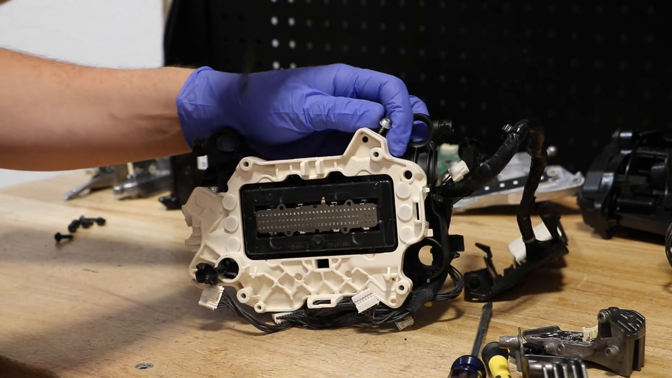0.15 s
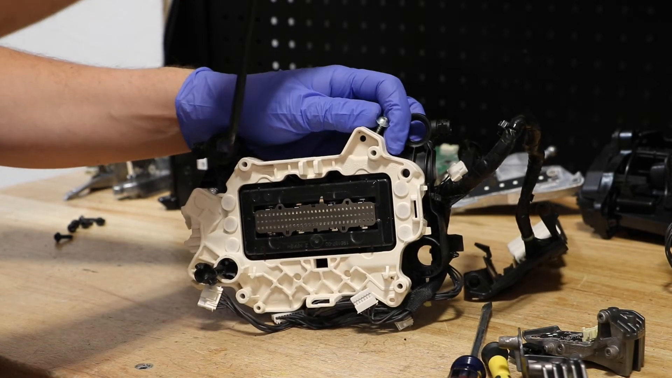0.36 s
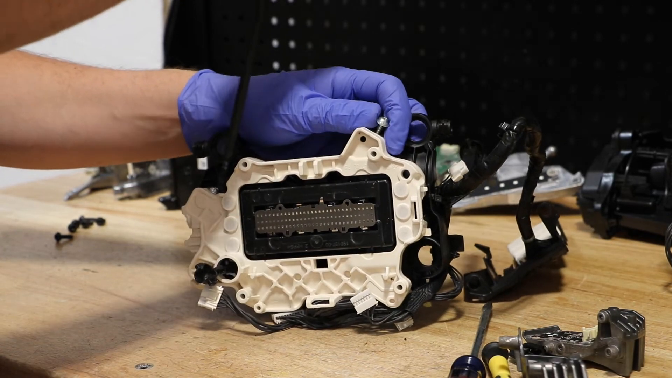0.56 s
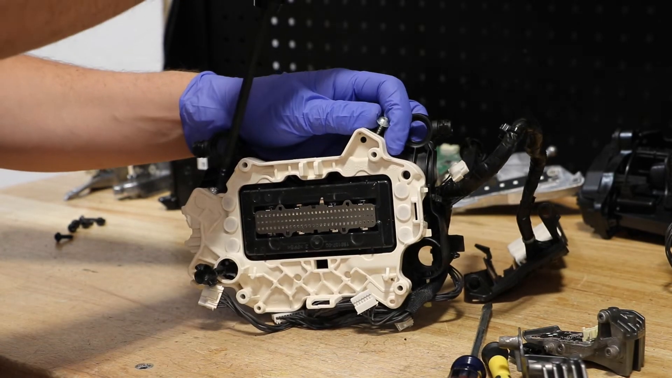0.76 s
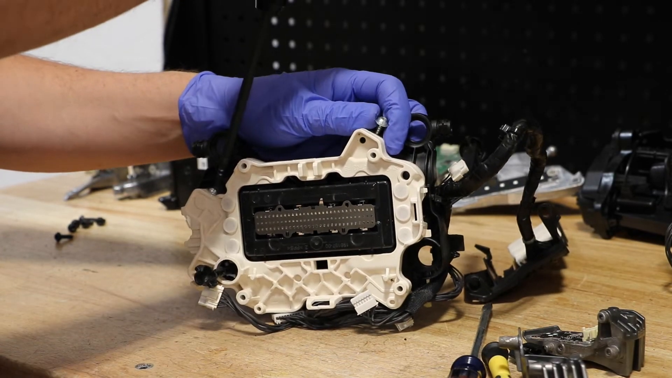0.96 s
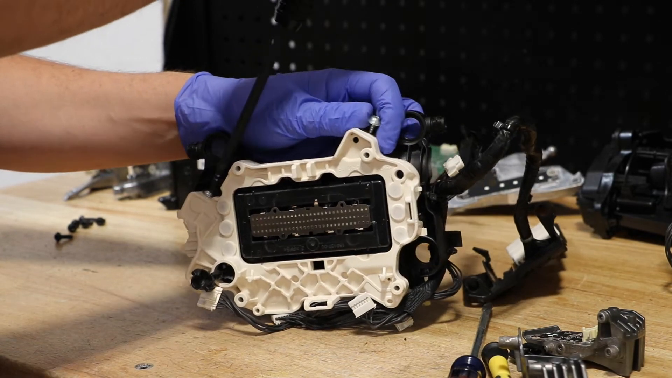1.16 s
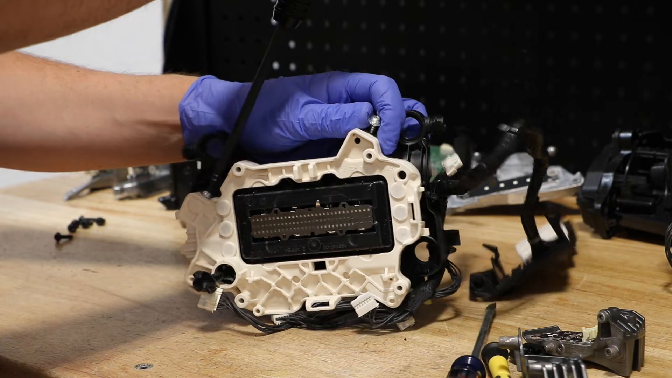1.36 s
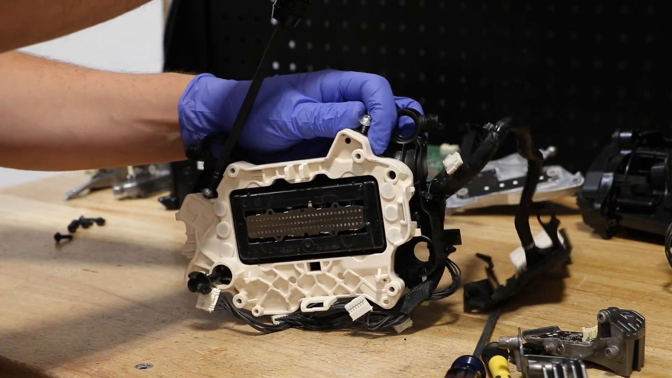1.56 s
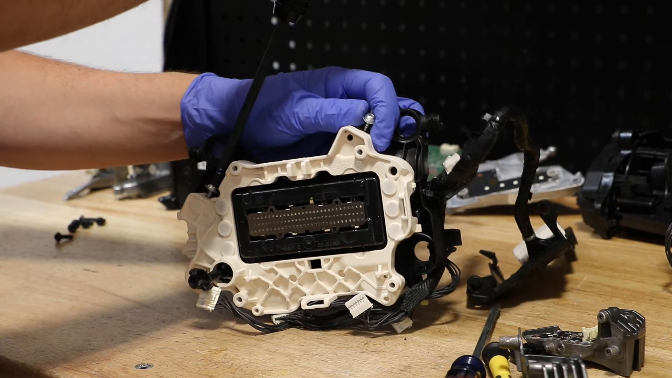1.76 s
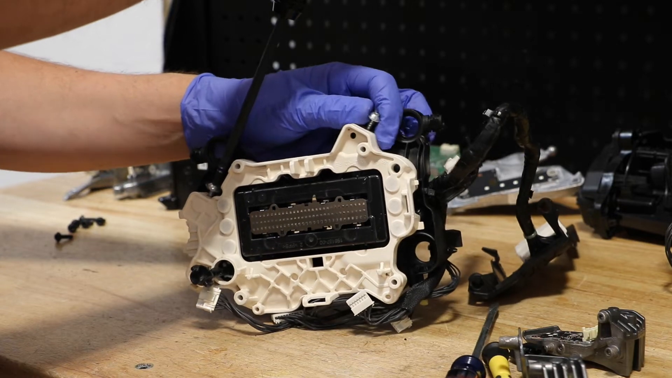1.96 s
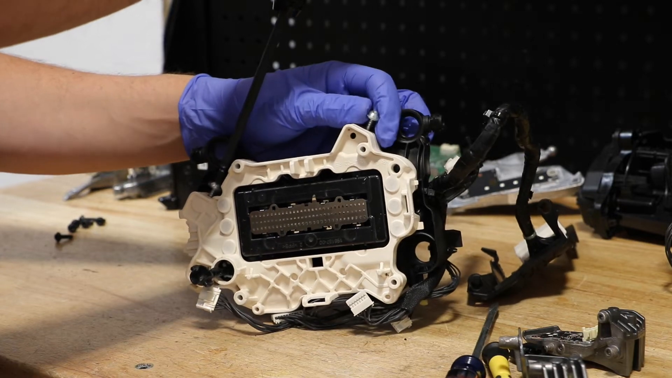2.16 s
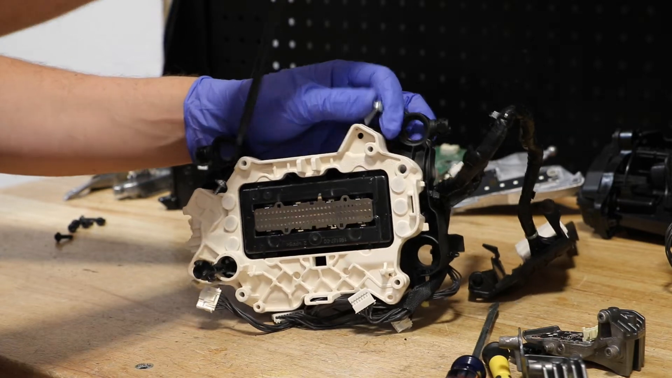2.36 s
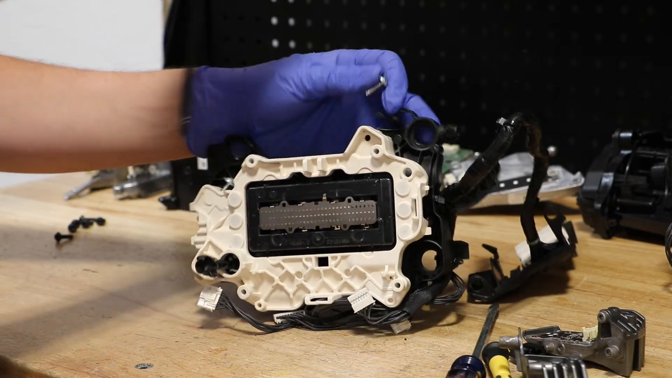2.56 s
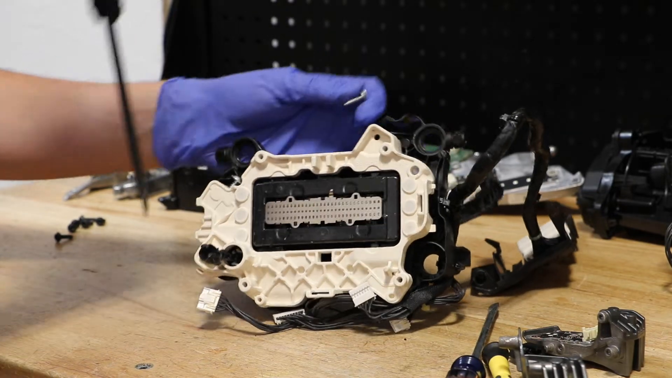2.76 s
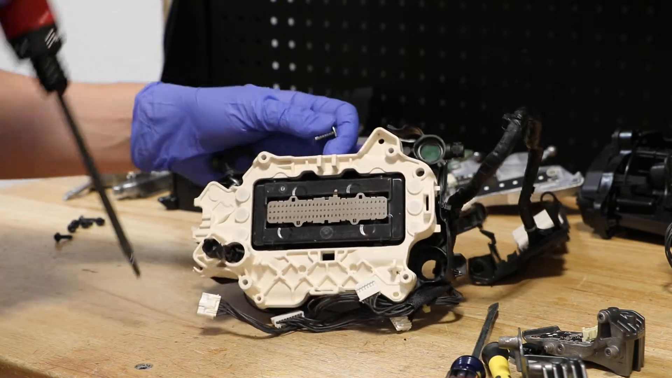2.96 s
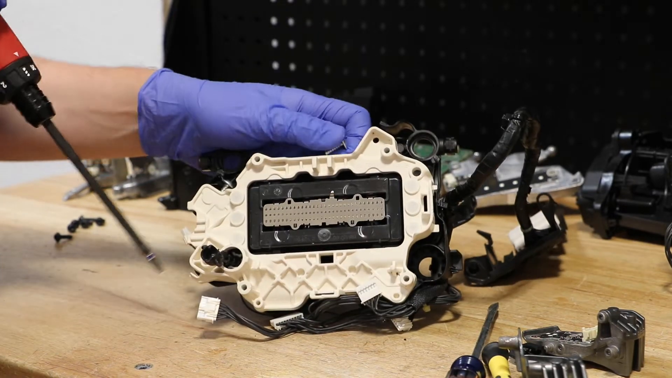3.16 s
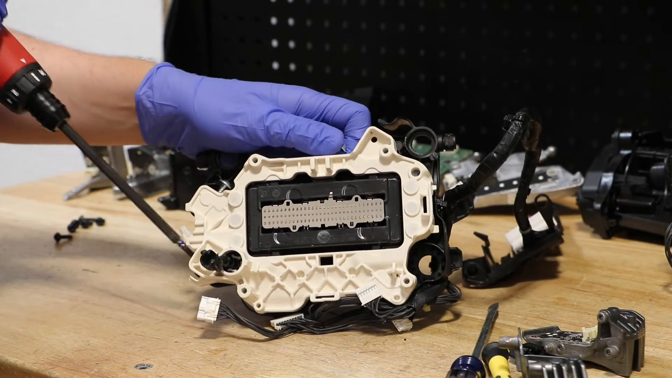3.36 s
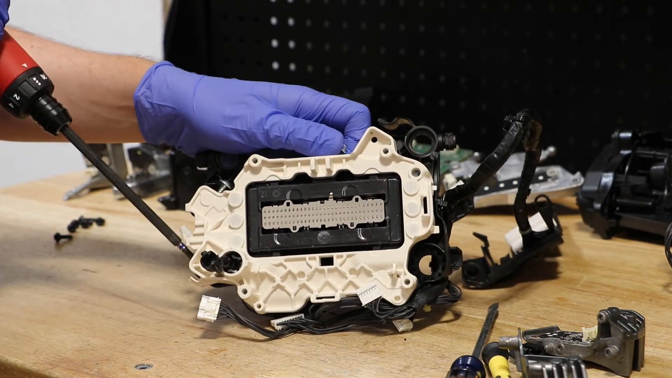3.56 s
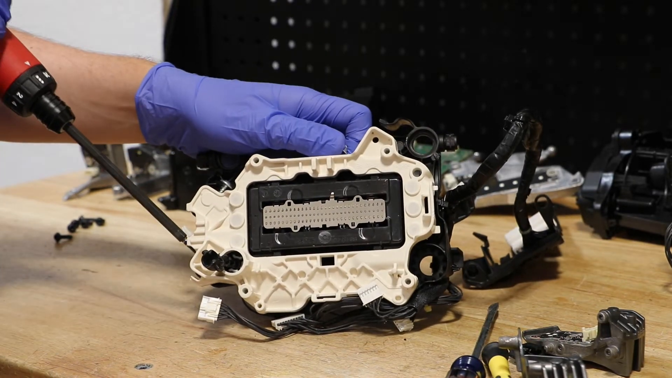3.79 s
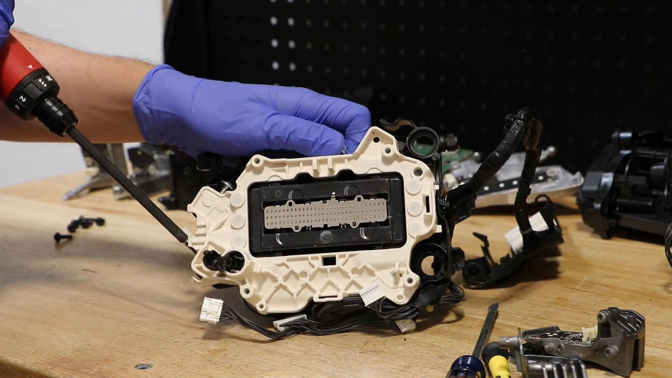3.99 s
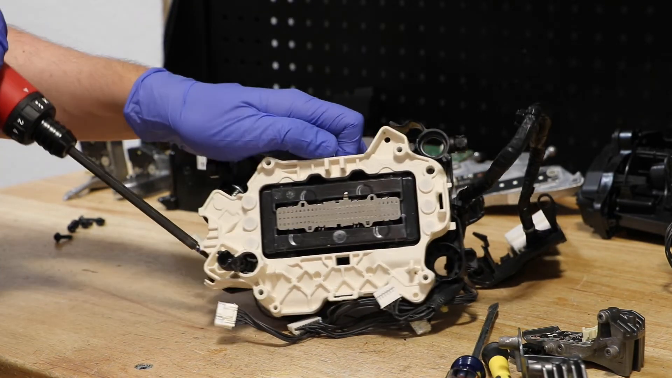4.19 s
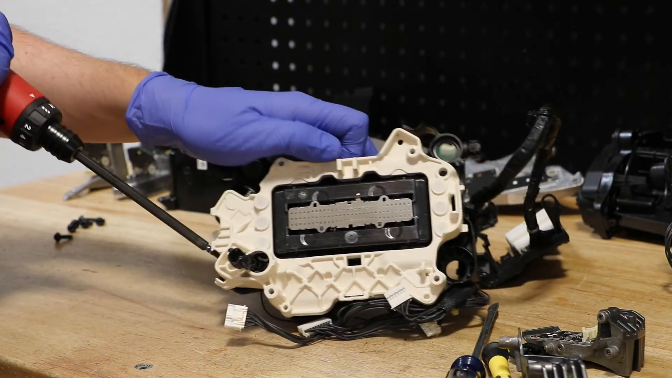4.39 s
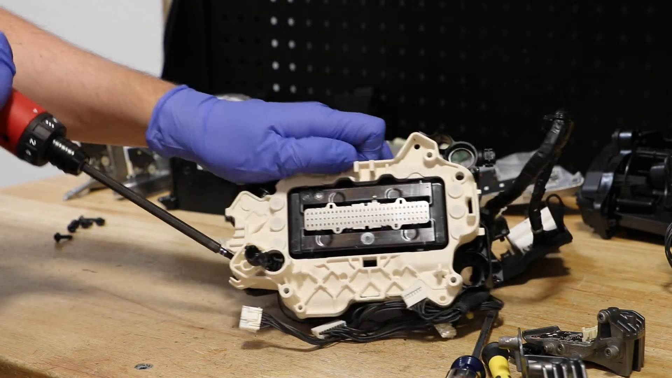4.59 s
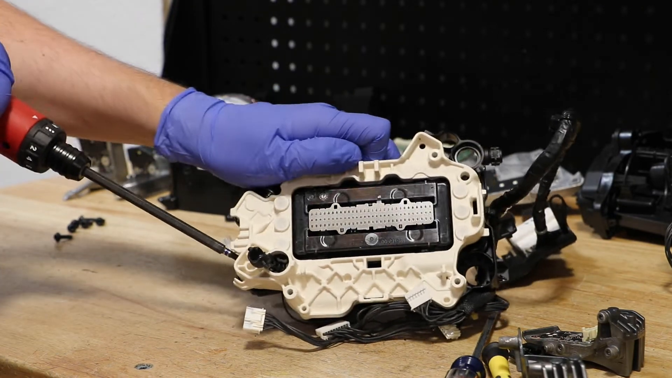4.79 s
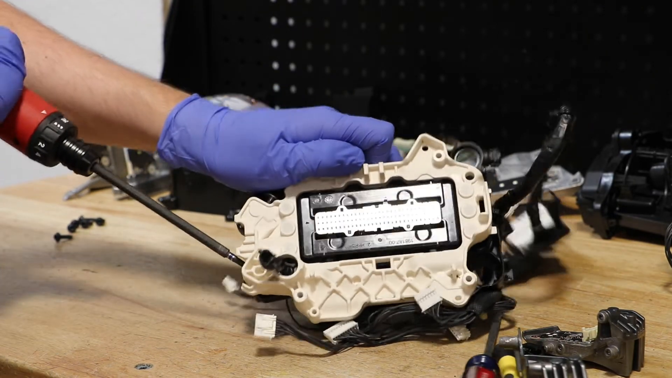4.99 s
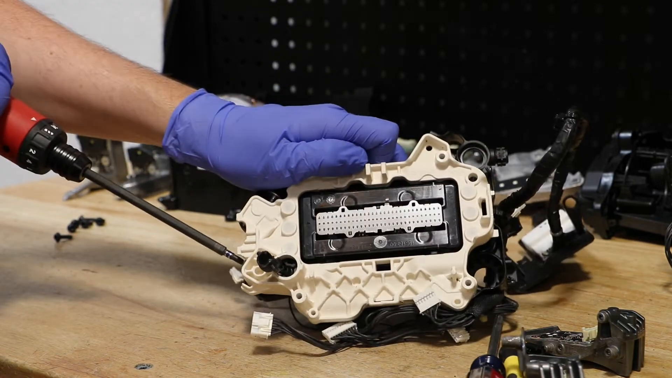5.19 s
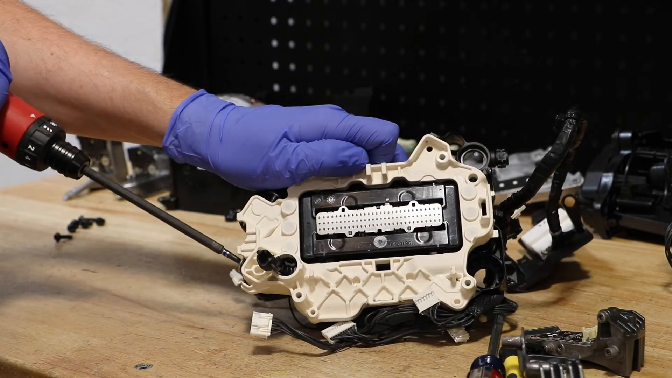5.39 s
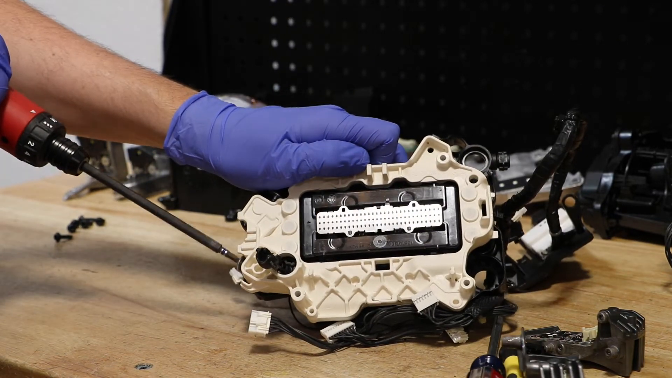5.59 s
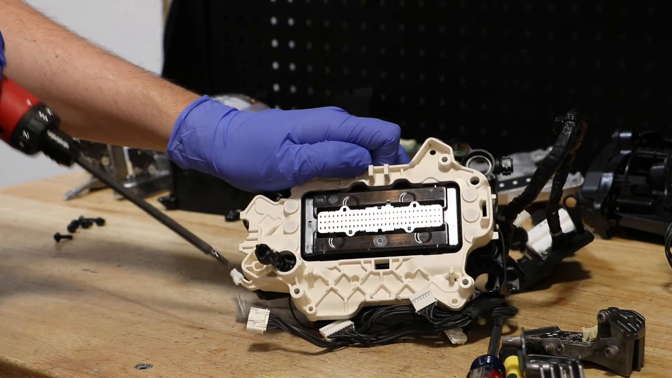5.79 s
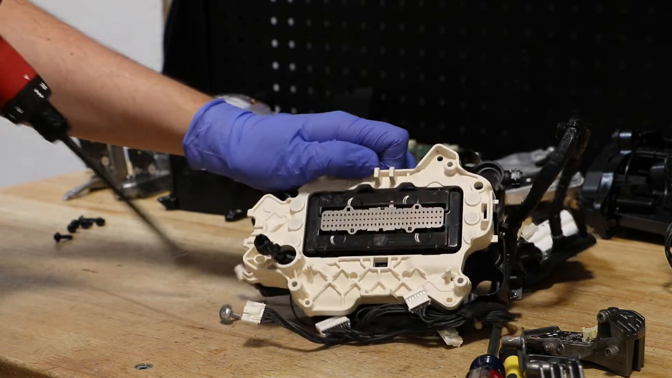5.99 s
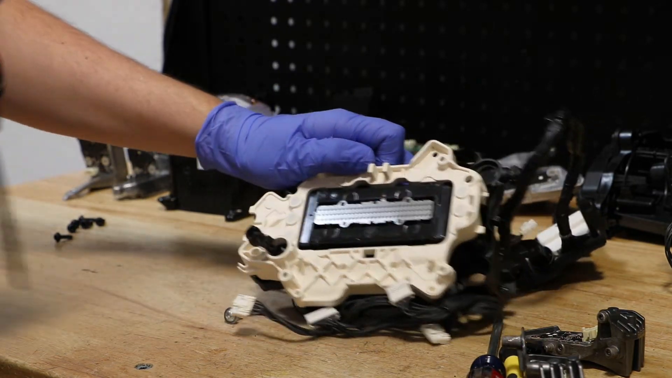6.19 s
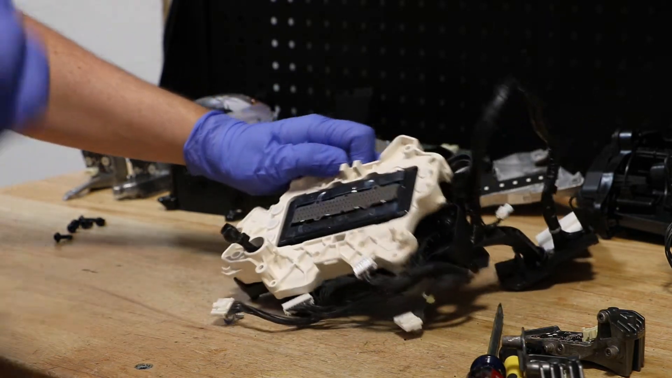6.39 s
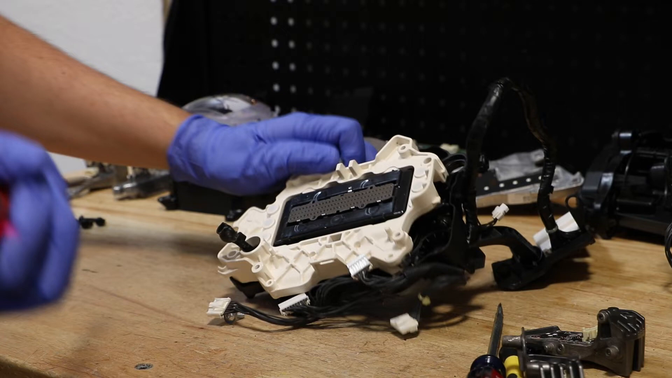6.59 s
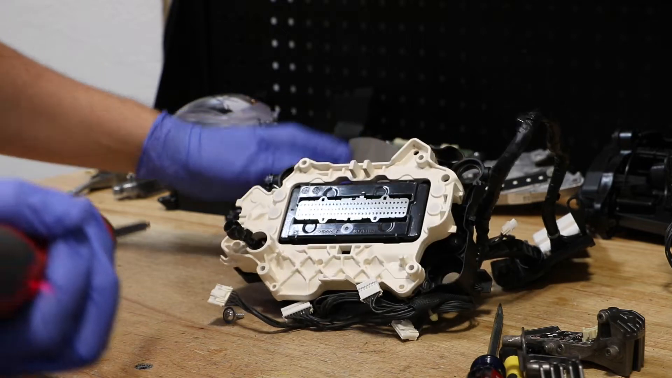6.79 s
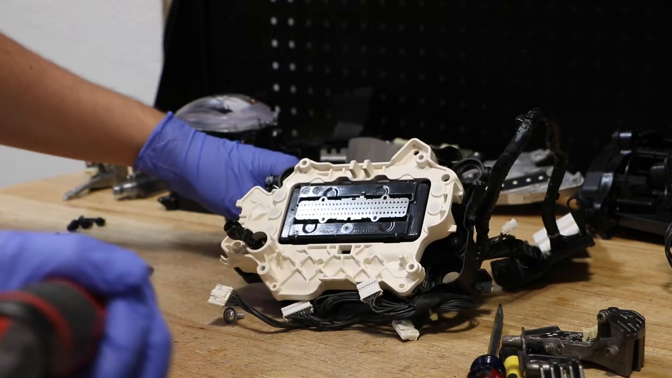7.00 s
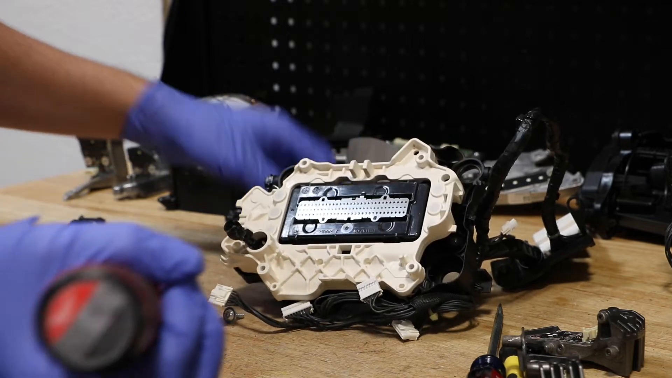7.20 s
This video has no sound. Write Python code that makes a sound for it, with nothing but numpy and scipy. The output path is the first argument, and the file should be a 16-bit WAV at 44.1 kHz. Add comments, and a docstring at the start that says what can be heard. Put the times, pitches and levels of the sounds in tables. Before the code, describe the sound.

The last rattle of a slowing power screwdriver fades, sharp plastic clicks follow, and the tool whines up for about a second, rattling hard before coasting down. Knocks, a ringing bit, dull bench bumps, scrapes and glove rubs fill the pause. A second, stronger-whining burst starts with a heavy thump, then handling knocks close it. Close mono microphone, small cluttered workshop with short reverberation.

```python
"""A motor's rattle dies away amid clicks; then a cordless screwdriver twice whines up, rattles and coasts down.
It backs screws out of a plastic housing on a wooden bench, close to a mono microphone. Tonal partials follow
the rotor, and random impacts ringing a shell make the rattle. Decaying modes make the knocks of bit and screws
and the bumps on the bench; filtered slips make the rubbing of housing, gloved hand and wiring loom."""
import sys
import numpy as np
from scipy import signal
from scipy.fft import rfft, irfft
from scipy.io import wavfile

SR = 44100
rng = np.random.default_rng(int(sys.argv[2]) if len(sys.argv) > 2 else 0)


def transcribe(signal):
    """Save signal, clipped to [-1, 1], as a 16-bit WAV file at the path in sys.argv[1]."""
    frames = np.atleast_2d(signal).T
    limited = np.clip(frames, -1, 1)
    pcm = np.round(limited * 32767).astype(np.int16)
    wavfile.write(sys.argv[1], SR, pcm)


N = 319725
TIME = np.arange(N) / SR

# pulls of the trigger: trigger_s, bite_s, release_s, sag_under_load_hz, rattle_gain_db,
# extra_rattle_under_load_db, treble_at_full_speed_db, treble_per_halving_of_speed_in_coasting_db,
# whine_gain_db, whine_change_in_coasting_db
RUNS = [(-1.3, -1.2, -.31, 300, -21, 0, 2, -7, -48, -8),
        (1.245, 1.328, 2.19, 270, -21.8, 7, -3.3, -3.7, -28.5, -4),
        (4.822, 4.85, 5.8, 330, -21.2, 2.5, -5.8, -7.5, -23, -18)]
# partials of motor and gears: multiple_of_rotor_speed, relative_level_db; the third is the whine
PARTIALS_FIRST = [(2, -20), (3, -0.5), (4, -11), (6, -4.5), (7, -4), (7.5, -3.5)]
PARTIALS_SECOND = [(3, -2.5), (4, -11.5), (6, -42), (7, -10), (7.5, -4.5)]
# colour of the rattle: frequency_hz, relative_density_db_per_hz
RATTLE_FIRST = [(180, -46.5), (300, -30.5), (400, -33), (540, -10), (854, 1.5), (944, -1.5), (1690, -1),
                (2690, -1), (3330, 0), (5130, -11), (7280, -7.5), (10800, -13), (14400, -31), (15900, -62)]
RATTLE_SECOND = [(180, -39), (300, -25.5), (400, -22), (520, -12), (700, -2.5), (854, 0.5), (944, -2),
                 (2130, 0), (2690, -2), (3560, -0.5), (4880, -9), (6270, -8), (7910, -17), (10100, -17),
                 (14100, -35.5), (15900, -51)]


def screwdriver():
    """Forced vibration: rotor speed and screw load drive the rattle and whine of a dying run and two full ones."""
    out = np.zeros(N)
    spectra = [RATTLE_FIRST, RATTLE_FIRST, RATTLE_SECOND]
    # the dying run mostly rattles; its faint whine is a single partial
    partial_sets = [PARTIALS_SECOND[:1], PARTIALS_FIRST, PARTIALS_SECOND]
    for run, spectrum, partials in zip(RUNS, spectra, partial_sets):
        trigger, bite, release, sag_hz, rattle_db, strain_db, treble_db, dull_db, whine_db, coast_db = run
        whine_hz, load = motor(trigger, release, sag_hz)
        turns = rotor(whine_hz)
        speed = whine_hz / FREE_HZ * (TIME > bite)   # no rattle before the bit bites
        coasting = np.clip((TIME - release) * 20, 0, 1)
        treble = treble_db - dull_db * np.log2(speed + 1e-3) * coasting
        rattle_gain = from_db(rattle_db + strain_db * load)
        whine_gain = from_db(whine_db + coast_db * coasting)
        out += rattle_gain * rattle(speed, load, treble, spectrum, turns)
        out += whine_gain * whine(whine_hz, partials, turns)
    return out


# whine pitch without load, its fixed rate of rise, and the time constant of the loosening screw
FREE_HZ, SPIN_UP_HZ_PER_S, LOOSEN_S = 900, 2800, 0.28
# drag slows the rotor exponentially, towards a speed this far below rest: dry friction stops it
COAST_S, DRY_FRICTION_HZ = 0.9, 1130


def motor(trigger, release, sag_hz):
    """Rotational dynamics: steady spin-up, sag under a load that fades from one to zero, drag and dry friction."""
    driven_s = np.clip(TIME, trigger, release) - trigger
    load = np.exp(-driven_s / LOOSEN_S)
    driven_hz = np.minimum(SPIN_UP_HZ_PER_S * driven_s, FREE_HZ - sag_hz * load)
    coast = np.exp(-np.maximum(TIME - release, 0) / COAST_S)
    whine_hz = np.maximum((driven_hz + DRY_FRICTION_HZ) * coast - DRY_FRICTION_HZ, 0)
    return whine_hz, load


def rotor(whine_hz, wobble=.003):
    """Phase integration: turns of a rotor whose three poles give three whine cycles a turn."""
    return np.cumsum(whine_hz * (1 + wobble * drift(60))) / (3 * SR)


# how well the casing radiates the whine: whine_pitch_hz, gain_db
WHINE_RESPONSE = [(235, -45), (362, -22), (490, -7), (640, 0), (800, -1), (865, -1), (892, -9)]


def whine(whine_hz, partials, turns, flutter_db=3.0, backlash_turns=0.22, gear_rise=4.0):
    """Additive synthesis: a clean pole tone, and gear partials that grow with speed and waver with tooth play."""
    speed = whine_hz / FREE_HZ
    tones = np.zeros(N)
    for order, db in partials:
        level = from_db(db + flutter_db * drift(35))
        slip = 0
        if order != 3:
            level = level * speed ** gear_rise
            slip = backlash_turns * drift(70)   # in cycles of this partial
        tones += level * np.sin(2 * np.pi * (order * turns + slip))
    radiation = from_db(np.interp(whine_hz, *np.transpose(WHINE_RESPONSE)))
    return np.sqrt(2) * radiation * (whine_hz > 0) * tones


def rattle(speed, load, treble_db, spectrum, turns, low_db=-8.5, loaded_low_db=9.0, slow_low_db=4.0,
           loaded_treble_db=-4.0, throb=0.17, force_rise=0.45):
    """Shot noise: tooth and thread impacts ring the casing, throb each turn, thin when slow, deepen under load."""
    impacts = contacts(per_s=5000 * np.sqrt(speed), spread_db=2.0)
    impacts = impacts * (1 + throb * np.cos(2 * np.pi * turns)) * from_db(1.0 * drift(90))
    force = speed ** force_rise
    ringing = coloured(shell(impacts * force, share=0.56, t60=0.033), spectrum)
    low_level = low_db + loaded_low_db * load + slow_low_db * (1 - speed)
    levels = [low_level, 0, treble_db + loaded_treble_db * load]
    balanced = sum(from_db(level) * rms_one(band) for level, band in zip(levels, three_bands(ringing)))
    return np.sqrt(np.mean(np.sqrt(speed) * force ** 2)) * balanced


# the turning screw and the leaning hand shake the bench: start_s, held_s, gain_db
SHAKES = [(1.31, .03, -44), (1.71, .02, -51), (1.99, .19, -32), (3.88, .02, -45), (4.57, .05, -43),
          (4.93, .04, -32), (5.05, .05, -42), (5.44, .15, -37)]
# colour of the bench rumble: frequency_hz, relative_level_db
RUMBLE = [(25, -29), (45, -10), (68, 5), (100, -12), (135, -6), (185, -6), (260, -19), (600, -34),
          (1500, -69)]


def bench_shaking():
    """Structure-borne sound: random pushes heard as the low rumble of the bench."""
    gain = strokes(SHAKES, attack_s=0.07, release_s=0.09)
    return friction(gain, RUMBLE, per_s=600, spread_db=0.5, judder_db=1.0, level_db=-1.0)


# bit and screws knocking on the housing: start_s, level_db, contact_hardness_0_to_1, buzz_before_lift_db
KNOCKS = [(.011, -30, .7, -42), (.281, -55, .65, -72), (.463, -63, .45, -85), (.561, -65, .7, -88),
          (.726, -15.3, .62, -35), (.879, -27.5, .4, -51), (.989, -20.5, .82, -34.5),
          (1.0891, -14.5, .85, -31), (1.114, -19, .52, -37), (1.262, -31, .95, -48), (1.327, -27, .85, -45),
          (1.343, -14, .64, -40), (1.356, -17, 1.0, -45), (1.522, -20, .5, -39.5), (2.236, -16.5, 1.0, -58),
          (2.699, -41, .75, -44), (2.863, -29, .1, -55), (3.139, -29, .15, -43), (3.162, -39, .35, -56),
          (3.390, -32, .25, -62), (3.416, -16.5, .71, -31), (3.804, -48, .65, -35.5),
          (3.817, -33, .55, -32), (3.827, -26, .85, -42), (3.888, -22, .8, -48), (4.257, -41, .7, -60),
          (4.781, -25.5, .8, -42), (4.85, -28, .6, -38.5), (4.862, -15, .68, -38), (4.887, -12, .64, -48),
          (5.771, -20, .68, -43), (5.849, -15.5, .45, -40), (5.961, -19.5, .55, -38.5),
          (6.034, -20, .45, -47), (6.448, -25.5, .3, -37), (6.477, -27, .36, -41), (6.726, -51, .6, -74),
          (7.147, -24, .48, -48), (7.156, -15, .33, -36), (7.212, -17.3, .4, -42)]
# modes of the plastic housing, before the bands are balanced: frequency_hz, relative_level_db
HOUSING = [(620, -8.5), (830, 2.5), (1150, 0), (1550, 0.5), (2200, 4), (2900, 8.5), (3500, 7.5),
           (3900, 11.5), (5500, -6.5), (6150, -13), (7300, -15), (9000, -10), (10600, -15.5)]
# buzz of the steel bit and loose metal parts: frequency_hz, relative_density_db_per_hz
STEEL = [(500, -34), (1500, -9), (2000, 1), (2250, 2), (2550, 1.5), (2900, -1.5), (4000, -8.5), (5000, -16),
         (9000, -33.5), (15000, -50.5)]
# lowpass cutoff of the softest contact, and how far above it the hardest one reaches
SOFT_CONTACT_HZ, HARDNESS_OCTAVES = 1000, 4.0
# low and treble bands against the middle, before the contact softens them
HARD_LOW_DB, HARD_TREBLE_DB = -7.0, 1.0


def knocks(chatter_s=0.0017, chatter=0.4, housing_t60=0.011, buzz_t60=0.29, buzz_lift_db=4.5, low_cut_hz=520):
    """Modal excitation: a touch and brief chatter ring the housing, duller if soft; loose steel buzzes on."""
    out, t = np.zeros(N), np.arange(SR // 3) / SR
    level_window = .02 * SR   # levels are rms as if all energy fell within 20 ms
    modes = [(hz, db, housing_t60 * (hz / 3000) ** -.4) for hz, db in HOUSING]
    small_body = signal.butter(3, low_cut_hz, "high", fs=SR, output="sos")
    for s, db, hardness, buzz_db in KNOCKS:
        force = chatter * rng.standard_normal(len(t)) * t / chatter_s * np.exp(-t / chatter_s)
        force[0] = 1   # first touch
        ring = struck(modes, t[:len(t) // 10], detune=0.042, uneven_db=2.5)
        body = signal.fftconvolve(force, ring)[:len(t)]
        low, middle, treble = map(rms_one, three_bands(signal.sosfilt(small_body, body)))
        balanced = from_db(HARD_LOW_DB) * low + middle + from_db(HARD_TREBLE_DB) * treble
        contact_hz = min(SOFT_CONTACT_HZ * 2 ** (HARDNESS_OCTAVES * hardness), .45 * SR)
        body = signal.sosfilt(signal.butter(4, contact_hz, fs=SR, output="sos"), balanced)
        add(out, s, from_db(db) * body * np.sqrt(level_window / np.sum(body ** 2)))
        buzz_decay = from_db(buzz_db + buzz_lift_db - 60 * t / buzz_t60)
        add(out, s, buzz_decay * coloured(rng.standard_normal(len(t)), STEEL))
    return out


# the long steel bit sings after some knocks and as it comes to rest: start_s, level_db, pitch_hz, t60_s
SINGS = [(0.731, -29, 2890, 0.55), (3.421, -29.5, 2264, 0.47), (3.635, -51, 2300, 0.2),
         (3.89, -36, 2880, 0.35), (6.2, -43, 5600, 0.35), (6.3, -51, 3950, 0.7)]


def singing(half_width_hz=130):
    """Damped resonance: the bit rattles in its chuck, so its ring is a narrow band that dies away."""
    out = np.zeros(N)
    for s, db, hz, t60 in SINGS:
        decay = from_db(db - 60 * np.abs(TIME - s) / t60)
        out += (TIME > s) * decay * narrow_noise(hz, half_width_hz)
    return out


# housing bumping on the bench: start_s, level_db, pitch_hz, t60_s
BUMPS = [(1.116, -28.5, 56, 0.36), (2.96, -39, 117.6, 0.28), (3.422, -32.5, 85, 0.23),
         (3.829, -42.5, 109.7, 0.29), (4.858, -17, 77, 0.14), (4.87, -25, 180, 0.25),
         (4.889, -19, 340, 0.06), (5.85, -36, 386, 0.067), (6.477, -25.5, 192, 0.18)]


def bumps():
    """Modal synthesis: each dull thud is a cluster of bench modes around one pitch."""
    out, t = np.zeros(N), np.arange(SR // 2) / SR
    for s, db, hz, t60 in BUMPS:
        modes = [(hz * 2 ** octave, -9 * abs(octave), t60) for octave in np.linspace(-.5, 1, 6)]
        add(out, s, from_db(db) * struck(modes, t, detune=0.025, uneven_db=2.0))
    return out


# housing rubbing as it shifts: start_s, held_s, gain_db, first_resonance_hz, last_resonance_hz
DRAGS = [(.866, .008, -34, 850, 845), (1.19, .12, -37, 830, 900), (2.77, .13, -30.5, 920, 790),
         (2.925, .05, -27.5, 790, 650), (3.03, .02, -41, 640, 640), (3.11, .01, -47, 810, 820),
         (3.375, .012, -40, 865, 840), (4.335, .02, -33, 1100, 1150), (4.6, .04, -31.5, 1200, 1170),
         (4.93, .055, -22, 700, 620), (6.34, .05, -45, 1075, 1150)]
# colour of the scrape: frequency_hz, relative_level_db
DRAG = [(200, -28), (400, -34), (600, 0.5), (1300, 0), (1600, -7), (3100, -7.5), (4500, -17), (5500, -31),
        (11000, -39), (15000, -52)]


def dragging(half_width_hz=110, groan_db=-1.5):
    """Friction-driven resonance: the housing scrapes and its shell groans at a pitch gliding through each stroke."""
    gain = strokes(DRAGS, attack_s=0.04, release_s=0.08, curve=1.0)
    scrape = friction(gain, DRAG, per_s=2600, spread_db=0.5, judder_db=2.5, level_db=-3.0)
    glide = []
    for s, held, _, first_hz, last_hz in DRAGS:
        glide += [(s, first_hz), (s + held, last_hz)]
    groan_hz = np.interp(TIME, *np.transpose(glide))
    return scrape + from_db(groan_db) * gain * narrow_noise(groan_hz, half_width_hz)


# glove sliding over the plastic: start_s, held_s, gain_db
SLIDES = [(4.345, .17, -24.5), (4.58, .075, -22.5), (4.76, .08, -42), (6.68, .02, -58), (6.865, .02, -24.5)]
# colour of the glove: frequency_hz, relative_level_db
SLIDE = [(40, -14.5), (70, -8), (200, -13), (400, -25), (650, -4), (1100, 2), (2000, 0.5), (4000, -3.5),
         (9700, -3), (14000, -23), (16000, -43)]


def glove_sliding():
    """Sliding friction: dense fine slips of the glove merge into a soft hiss."""
    gain = strokes(SLIDES, attack_s=0.075, release_s=0.095)
    return friction(gain, SLIDE, per_s=13000, spread_db=2.0, judder_db=0.8, level_db=-2.5)


# bit grating in the screw head: start_s, held_s, gain_db
GRATES = [(4.14, .03, -34.5)]
# colour of the grating: frequency_hz, relative_level_db
GRATE = [(500, -17), (1400, -26), (2300, -0.5), (3000, -2.5), (4000, -8), (5200, -36), (9500, -31),
         (15000, -53)]


def bit_grating():
    """Coarse friction: sparse, uneven slips of the bit in the screw head juddering in level."""
    gain = strokes(GRATES, attack_s=0.09, release_s=0.13)
    return friction(gain, GRATE, per_s=2000, spread_db=2.5, judder_db=2.5, level_db=-3.5)


# wiring loom and its plugs rustling: start_s, held_s, gain_db
LOOMS = [(6.15, .12, -41), (7.15, .1, -31.5)]
# colour of the rustle: frequency_hz, relative_level_db
LOOM = [(300, -33), (600, -1), (1100, 8.5), (3500, 3), (4800, -3), (5900, 1), (6800, -42), (12000, -50)]


def loom_rustling():
    """Random contacts: wires and plugs touch sparsely and very unevenly."""
    gain = strokes(LOOMS, attack_s=0.018, release_s=0.1)
    return friction(gain, LOOM, per_s=1600, spread_db=3.5, judder_db=3.5, level_db=-2.0)


# colour of the workshop reverberation: frequency_hz, relative_level_db
ROOM = [(200, -7), (800, -3), (1500, -5.5), (2700, -5.5), (4500, -5), (7000, -9), (14000, -7.5)]


def workshop(x, t60, gap_s):
    """Diffuse reverberation: convolution with the decaying noise tail of a small cluttered room."""
    t = np.arange(SR) / SR
    build_up = 1 - np.exp(-t / gap_s)
    tail = coloured(rng.standard_normal(SR), ROOM) * from_db(-60 * t / t60) * build_up
    return signal.fftconvolve(x, tail / np.sqrt(np.sum(tail ** 2)))[:N]


# colour of the workshop background: frequency_hz, relative_density_db_per_hz
FLOOR = [(25, -9), (60, -0.5), (120, -4.5), (380, -26.5), (800, -21.5), (2000, -30), (4200, -34),
         (13000, -36.5), (16000, -41)]


def background(level_db=-60.8):
    """Stationary noise: the steady, smoothly coloured floor of the workshop."""
    return from_db(level_db) * coloured(rng.standard_normal(N), FLOOR)


def friction(gain, spectrum, per_s, spread_db, judder_db, level_db):
    """Stick-slip friction: many small slips under each stroke of a rubbing surface."""
    slips = contacts(per_s, spread_db) * from_db(judder_db * drift(70))
    return from_db(level_db) * gain * coloured(slips, spectrum)


def strokes(rows, attack_s, release_s, curve=1.4):
    """Amplitude envelope: strokes swell by 20 dB in the attack, hold, and fall by 20 dB in the release."""
    t = TIME[::20]
    levels = []
    for s, held, db, *_ in rows:
        away = np.maximum((s - t) / attack_s, (t - s - held) / release_s).clip(0, 10)
        levels.append(db - 20 * away ** curve)
    return np.interp(TIME, t, from_db(np.max(levels, axis=0)))


def contacts(per_s, spread_db):
    """Poisson process: tiny impacts at random moments, of uneven size and random sign; rms one."""
    sizes = from_db(spread_db * np.minimum(rng.exponential(1, N), 4)) * rng.choice([-1, 1], N)
    return rms_one(sizes * (rng.random(N) < per_s / SR))


def struck(modes, t, detune, uneven_db):
    """Modal superposition: decaying sines, shifted and weighted anew as each blow lands elsewhere."""
    hz, db, t60 = np.transpose(modes)[:, :, None]
    shift, weight = rng.standard_normal((2, len(modes), 1))
    sign = rng.choice([-1, 1], (len(modes), 1))
    decay = from_db(db + uneven_db * weight - 60 * t / t60)
    return np.sum(sign * decay * np.sin(2 * np.pi * hz * (1 + detune * shift) * t), axis=0)


def shell(x, share, t60):
    """High modal density: a thin plastic shell adds a dense crowd of short resonances."""
    t = np.arange(SR // 10) / SR
    response = rng.standard_normal(len(t)) * from_db(-60 * t / t60)
    return x + share * signal.fftconvolve(x, response / np.sqrt(np.sum(response ** 2)))[:N]


def narrow_noise(hz, half_width_hz):
    """Heterodyning: noise lowpassed around zero and shifted to one resonance, which may move; rms one."""
    swing = np.exp(2j * np.pi * np.cumsum(hz * np.ones(N)) / SR)
    lowpass = signal.butter(2, half_width_hz, fs=SR, output="sos")
    ringing = signal.sosfilt(lowpass, rng.standard_normal(N) / swing)
    return rms_one(np.real(ringing * swing))


def coloured(x, spectrum):
    """Spectral shaping: a smooth gain over log frequency; rms one."""
    hz, db = np.transpose(spectrum)
    log_hz = np.log(np.arange(len(x) // 2 + 1) * SR / len(x) + 1)
    gain = from_db(np.interp(log_hz, np.log(hz), db))
    return rms_one(irfft(rfft(x) * gain, len(x)))


LOW_EDGE_HZ, HIGH_EDGE_HZ = 1500, 6500


def three_bands(x):
    """Filter bank: low, middle and treble parts."""
    edges = [(LOW_EDGE_HZ, "low"), ([LOW_EDGE_HZ, HIGH_EDGE_HZ], "band"), (HIGH_EDGE_HZ, "high")]
    return [signal.sosfilt(signal.butter(7, hz, kind, fs=SR, output="sos"), x) for hz, kind in edges]


def drift(rate):
    """Random modulation: a slow wander through `rate` knots a second, of rms one."""
    knots = rng.standard_normal(8192)
    return rms_one(np.interp(TIME * rate, np.arange(len(knots)), knots))


def from_db(db):
    """Logarithmic level: decibels to amplitude gain."""
    return 10 ** (np.asarray(db) / 20)


def rms_one(x):
    """Effective value: scale to unit rms."""
    return x / np.sqrt(np.mean(x ** 2) + 1e-20)


def add(out, s, sound):
    """Superposition: mix a sound in at its time in seconds."""
    at = max(round(s * SR), 0)
    out[at:at + len(sound)] += sound[:N - at]


def scene():
    """Direct and reverberant field: tool, knocks and handling in the room, the same in both channels."""
    hits = knocks() + bumps()
    rough = shell(bit_grating() + loom_rustling(), share=0.91, t60=0.027)
    steady = screwdriver() + bench_shaking() + singing() + dragging() + glove_sliding() + rough
    reverberant = workshop(from_db(-11) * hits + from_db(-14) * steady, t60=0.28, gap_s=0.0027)
    mono = hits + steady + reverberant + background()
    return np.array([mono, mono])


def record(dry, stopband_hz=16300):
    """Saturation and band-limiting: the loudest peaks are rounded off and the top is cut by 60 dB."""
    rounded = 1.2 * np.tanh(dry / 1.2)
    return signal.sosfilt(signal.cheby2(14, 60, stopband_hz, fs=SR, output="sos"), rounded)


dry = scene()
out = record(dry)
transcribe(out)
```